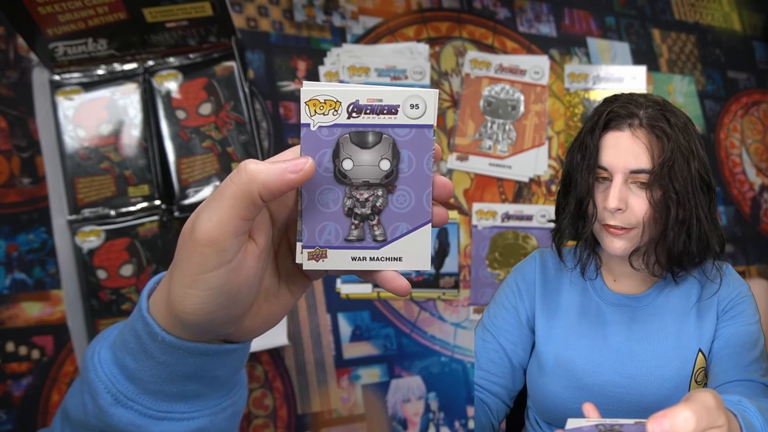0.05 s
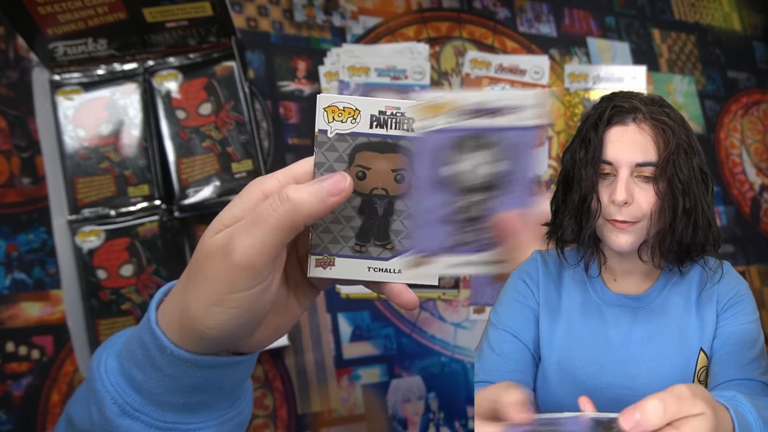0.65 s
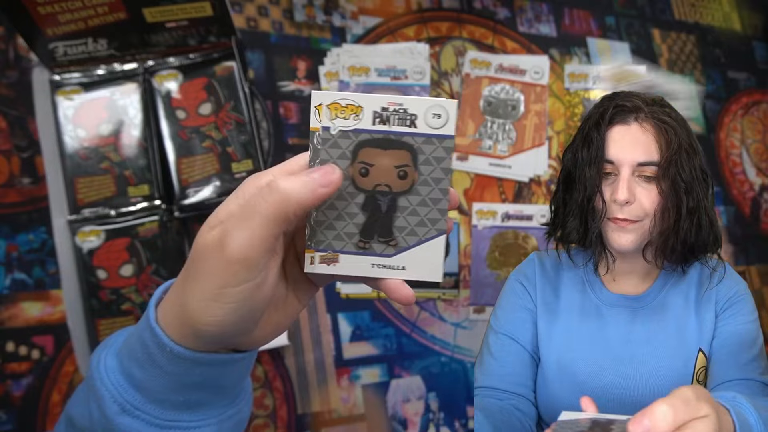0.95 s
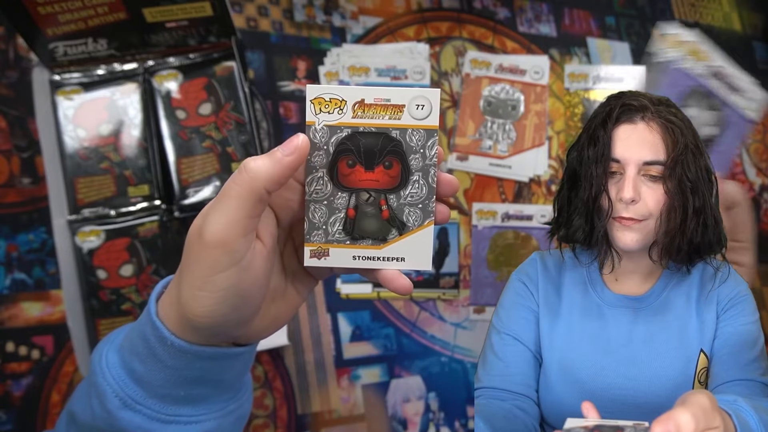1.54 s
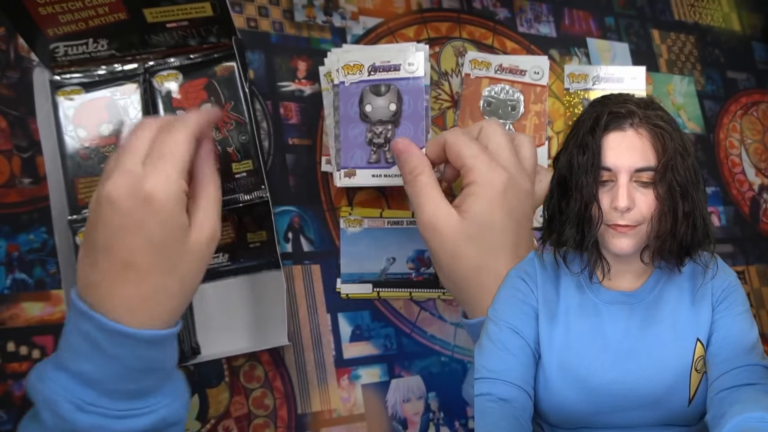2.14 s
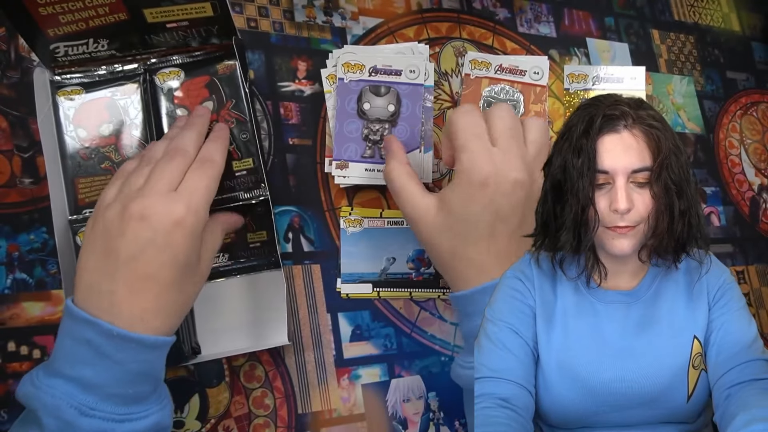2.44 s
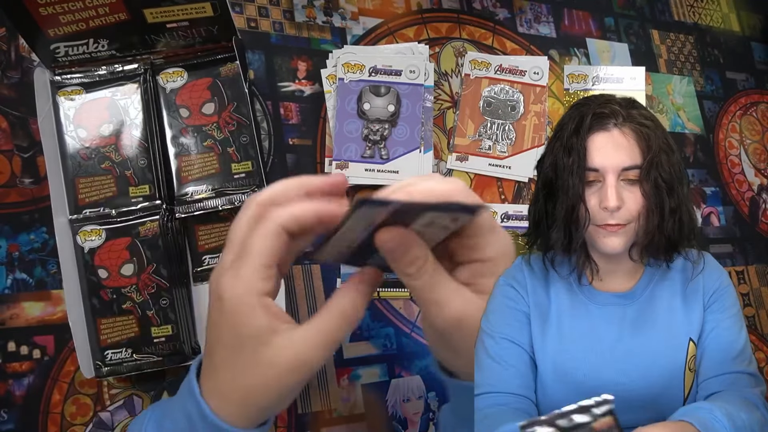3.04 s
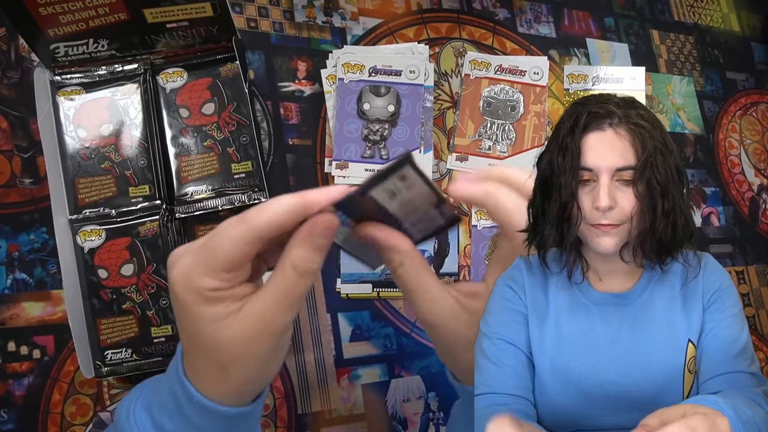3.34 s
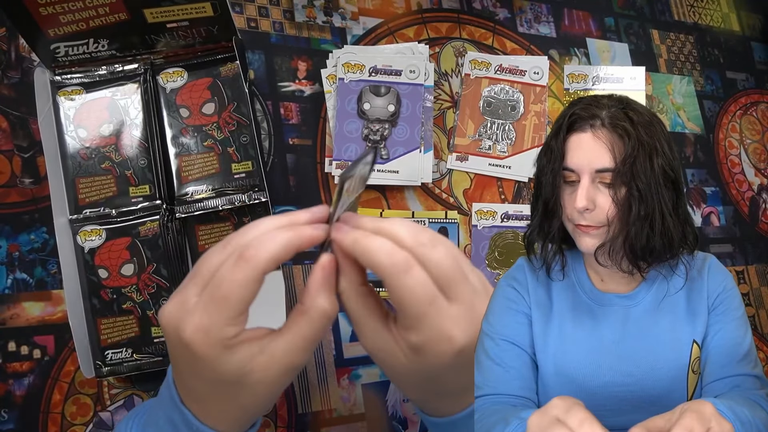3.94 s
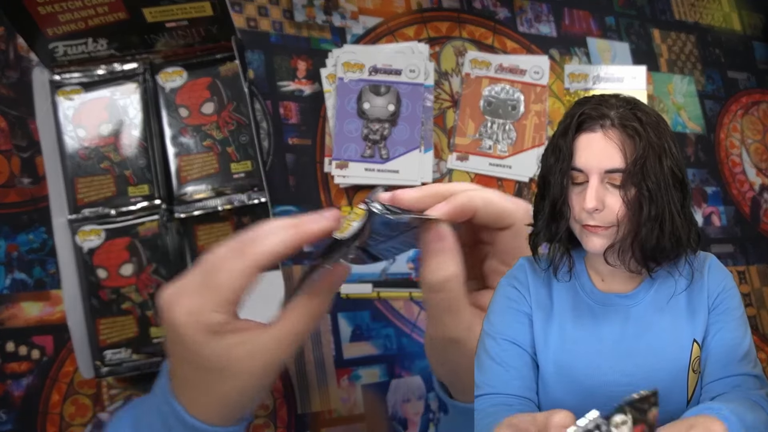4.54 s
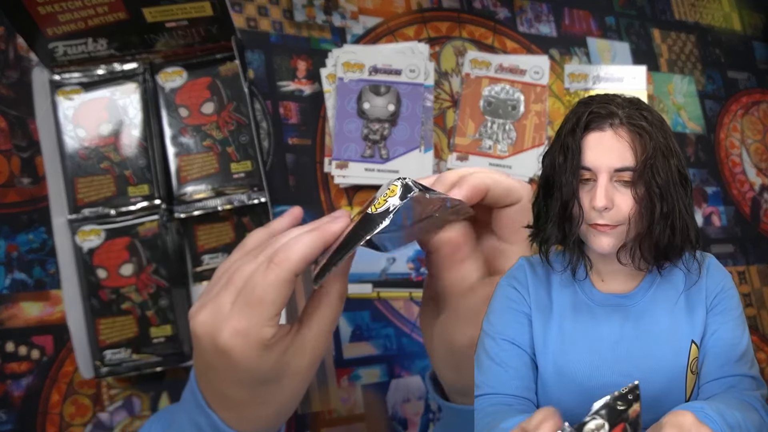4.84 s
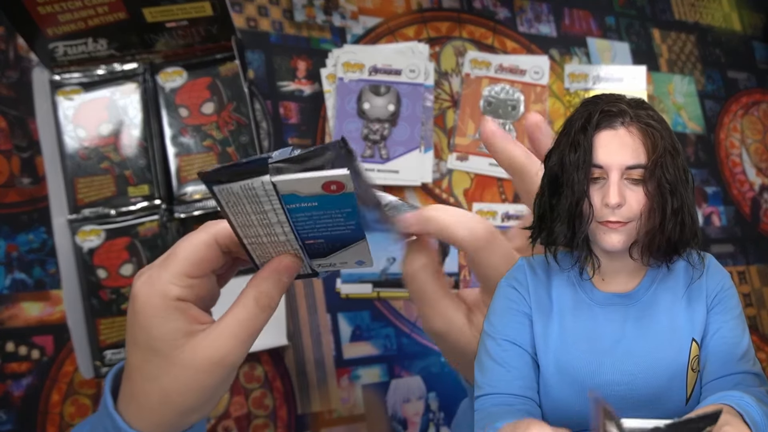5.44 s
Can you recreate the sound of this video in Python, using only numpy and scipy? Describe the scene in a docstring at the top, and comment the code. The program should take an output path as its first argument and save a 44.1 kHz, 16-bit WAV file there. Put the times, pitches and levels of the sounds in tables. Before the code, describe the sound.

Trading cards slide and land on a desk with a soft knock, then a foil pack is crinkled and torn open in two pulls.

```python
"""A foil pack is pinched and torn open in two pulls: creases snap one by one over a fine crackle,
and the pouch pops hollowly as its wall flips. Leading up to it, trading cards rasp off a stack
and land on a desk with a soft knock, and fingers skim the pack as they pick it up.
A small room answers, over a bed of low rumble, thin hiss and faint mains hum."""
import sys
import numpy as np
from scipy import signal
from scipy.io import wavfile

SR = 44100
rng = np.random.default_rng(int(sys.argv[2]) if len(sys.argv) > 2 else 0)


def pcm_store(signal):
    """Save signal as 16-bit PCM."""
    levels = np.round(np.clip(np.atleast_2d(signal), -1, 1) * 32767)
    wavfile.write(sys.argv[1], SR, levels.astype(np.int16).T)


N = 250598

# room tone: (frequency [Hz], relative level [dB])
AIR_EQ = [(20, 2), (70, -9.5), (170, -8.5), (260, -8.5), (360, -15), (700, -25), (1500, -30), (4000, -37.5),
          (15500, -39.5)]
# mains hum: (frequency [Hz], level [dB])
MAINS_HUM = [(60, -62.5), (120, -63), (241, -69.5)]
# room decay: (frequency [Hz], t60 [s])
ROOM_DECAY = [(150, 0.54), (500, 0.46), (1500, 0.28), (4000, 0.48), (8000, 0.3), (15000, 0.21)]
# tone of the reverb tail: (frequency [Hz], relative level [dB])
TAIL_EQ = [(100, 0.5), (450, 0.5), (1400, 3), (4000, -3.0), (8000, 2.0), (15000, 0.0)]
# hands jostling the desk: (start [s], hold [s], level [dB])
DESK_JOSTLES = [(2.4, 0.84, -58.5), (3.5, 0.99, -65), (5.05, 0.35, -58)]
# desk rumble: (frequency [Hz], relative level [dB])
RUMBLE_EQ = [(15, -3), (30, -3), (55, -3), (110, -17), (400, -61.5), (2000, -84)]
# hands and cards landing, and the jolt of the tear: (time [s], peak [dB], contact time [s])
DESK_KNOCKS = [(2.239, -43, 0.0047), (2.356, -28, 0.0024), (2.403, -35.5, 0.0062), (2.763, -38, 0.011),
               (5.16, -31.5, 0.0115)]
# body of the desk: (frequency [Hz], relative level [dB], t60 [s])
DESK_MODES = [(30.5, -13.5, 0.93), (67.5, -16.5, .2), (113.6, -1.5, 0.22), (125.5, 10, 0.15),
              (186.5, -0.5, 0.22), (231.5, 1.5, 0.16), (372, -4, 0.3), (485, -1.5, 0.18)]
# cards sliding off the stack: (start [s], hold [s], relative level [dB])
CARD_SLIDES = [(0, 0.037, -66.5), (0.514, 0.018, -67.5), (0.693, 0.0095, -55), (1.033, 0.016, -73.5),
               (1.121, .02, -63), (1.331, 0.0047, -53.5), (1.784, 0.12, -73), (1.929, 0.17, -69.5),
               (2.214, 0.078, -73), (2.42, 0.11, -68)]
# card on card: (frequency [Hz], relative level [dB])
RASP_EQ = [(100, -2), (500, -16), (900, -0.5), (1700, -0.5), (2300, 3.5), (3400, 2), (6500, 2.5),
           (10000, -2), (15500, -15)]
# fingers skimming smooth foil: (start [s], hold [s], relative level [dB])
FINGER_SKIMS = [(2.53, 0.21, -68.5), (2.73, 0.018, -55), (2.8, 0.097, -68), (2.945, 0.024, -61.5),
                (3.07, 0.057, -69), (3.355, 0.017, -62.5)]
# hiss of skin: (frequency [Hz], relative level [dB])
SKIN_EQ = [(300, -24), (1500, -2), (4000, -6.5), (7000, 0), (11000, -6.5), (15500, -13)]
# card edges, fingers and pack tapping: (time [s], level [dB], brightness [dB/octave], length [s])
LIGHT_TAPS = [(.703, -54.5, 5, .006), (1.0925, -39.5, 0, 0.0026), (1.337, -51.5, -3, 0.0029),
              (1.762, -54, -2, 0.003), (1.824, -57.5, 0, 0.0081), (2.294, -45, -2, 0.0081),
              (2.3562, -29, -2, 0.0034), (2.431, -48, 0, 0.011), (2.485, -51, 0, .0078),
              (2.5255, -54, 1, 0.006), (2.6075, -52.5, -1, 0.018), (2.7474, -32, 2, 0.015),
              (2.7614, -30, -1.8, 0.0023), (2.769, -37.5, -3.5, .0085), (2.996, -48.5, 6, 0.0009)]
# tone of a tap on card: (frequency [Hz], relative level [dB])
CARD_EQ = [(190, -34.5), (330, -0.5), (553, -3), (775, -12), (1280, -4), (2000, -8.5), (2860, -7),
           (4410, -12.5), (6930, -11.5), (8400, -18.5), (10200, -17.5), (15500, -27)]
# fingertips dragging on the pouch: (start [s], hold [s], level [dB])
POUCH_GRIPS = [(2.97, 0.75, -74), (4.45, 0.074, -53.5), (5.06, 0.12, -46), (5.25, 0.29, -57.5)]
# their dull rustle: (frequency [Hz], relative level [dB])
DRAG_EQ = [(50, -17.0), (420, 1.0), (700, -9), (1500, -14.5), (6000, -57)]
# the pouch flexing: (time [s], peak [dB], pitch [Hz])
POUCH_POPS = [(2.359, -33.5, 478), (2.7608, -35, 467), (3.618, -40.5, 485), (4.2, -36.5, 496),
              (4.353, -34, 395), (4.881, -30, 470), (4.892, -30, 442), (5.044, -26.5, 592),
              (5.073, -24.5, 455), (5.084, -29.5, 448), (5.134, -27, 460), (5.166, -18.5, 537),
              (5.279, -30, 436), (5.475, -34.5, 323), (5.61, -33, 443)]
# hollow body of the pouch: (pitch multiple, relative level [dB], t60 [s])
POUCH_MODES = [(.75, -7, .02), (1, 0, .035), (1.22, -4, .025), (1.65, -12, .02), (2.2, -11, .02),
               (2.6, -12, .025)]
# strain on the foil, from light pinches to ripping pulls: (start [s], hold [s], relative level [dB])
FOIL_PULLS = [(3.465, 0.043, -50), (3.59, 0.067, -45.5), (3.69, .06, -59), (3.765, .05, -50.5),
              (3.895, 0.071, -57), (3.99, 0.16, -61.5), (4.209, 0.067, -32.5), (4.29, 0.025, -41.5),
              (4.342, 0.021, -33.5), (4.44, 0.11, -55), (4.5, 0.018, -44.5), (4.742, 0.022, -55.5),
              (4.955, .04, -56), (5.005, 0.019, -44.5), (5.058, 0.031, -27.5), (5.113, 0.049, -28),
              (5.275, 0.033, -42), (5.35, 0.0084, -48.5), (5.465, 0.078, -54)]
# creases: (time [s], relative level [dB], brightness [dB/octave], length [s], facet pitch [Hz])
CREASE_SNAPS = [(3.2513, -47.0, 0.5, 0.0012, 5000), (3.2787, -49.0, -2.0, 0.0042, 3630),
                (3.46, -43, 6, 0.0025, 6470), (3.48, -36.5, 3.5, 0.003, 9200),
                (3.497, -34.0, 3.5, 0.0035, 10600), (3.5577, -33, 8, 0.0028, 8800),
                (3.569, -34.5, 3, 0.0026, 6140), (3.5851, -28, 4, 0.0024, 7850),
                (3.5937, -31.5, 4.5, 0.002, 6200), (3.6178, -24.0, 2.5, 0.0036, 5660),
                (3.641, -32, 3, 0.0036, 6000), (3.662, -37.5, -0.5, 0.0023, 7600),
                (3.6753, -34.5, -1, 0.0058, 2200), (3.763, -44, 0, 0.0044, 2100),
                (3.7794, -40, -2, 0.0072, 2200), (3.8079, -32, 2, 0.0018, 2200),
                (3.8114, -38, 2, 0.0024, 2340), (3.8173, -32.5, 3.5, 0.0033, 4300),
                (3.8867, -30, 3.5, 0.0012, 4400), (3.9021, -43, 7, 0.0025, 7200),
                (3.9305, -38.5, 0, 0.0095, 3900), (3.9933, -33.5, 0, 0.0018, 6900),
                (4.0556, -47.5, 18, 0.0021, 7300), (4.0836, -43.5, -0.5, 0.0022, 4470),
                (4.1284, -45, 14, 0.0024, 7900), (4.1726, -42.5, -1, 0.0042, 9200),
                (4.2, -19, 1, 0.0042, 2150), (4.2071, -18.5, 3, 0.0016, 2350),
                (4.227, -26, 1.0, 0.0045, 6100), (4.241, -22, 3.5, 0.003, 3670),
                (4.2648, -20.5, 4.5, 0.0013, 4740), (4.2841, -33.5, -8, 0.004, 1390),
                (4.2942, -21, 2.5, 0.0031, 8500), (4.3083, -35, -8, 0.0032, 1360),
                (4.333, -28.5, 4.5, 0.0012, 5770), (4.3374, -31.5, -0.5, 0.011, 1590),
                (4.3468, -27.5, 0.5, 0.0007, 3370), (4.3522, -20, 1.5, 0.0042, 6560),
                (4.4326, -42, 5, 0.0012, 7000), (4.465, -36.5, 1.5, 0.0034, 3450),
                (4.4803, -36, 5, 0.0022, 9800), (4.4935, -28.5, 6, 0.0016, 9600),
                (4.5084, -25.5, 0.5, 0.0026, 7500), (4.5229, -27.0, 0.5, 0.0013, 6860),
                (4.5767, -36.5, 0.5, 0.0025, 11100), (4.6192, -41.5, -1.5, 0.0018, 8850),
                (4.6902, -42, -1, 0.0064, 1300), (4.8297, -47.5, -4, 0.0018, 1490),
                (4.8795, -40.5, -5.5, 0.0035, 1200), (4.8885, -41, 0, 0.0024, 1160),
                (4.975, -35, 0, 0.0036, 4760), (4.9988, -38.5, 2.0, 0.0027, 7900),
                (5.0252, -34.5, 2.5, 0.0014, 8700), (5.032, -34, -3.5, 0.0038, 2300),
                (5.0448, -21.5, 1, 0.0026, 5100), (5.075, -18, 1, 0.0012, 9500),
                (5.084, -18.5, -3.5, 0.0016, 3060), (5.1213, -20.5, 1.5, 0.0043, 4600),
                (5.1578, -21.0, -4, 0.0042, 1190), (5.1631, -12, 2, 0.0022, 1430),
                (5.1675, -14, -2, 0.0022, 5400), (5.2256, -24, -1, 0.0038, 4500),
                (5.2764, -22.5, 0, 0.0066, 9200), (5.3524, -31.5, 2.5, 0.0024, 4100),
                (5.4092, -37.5, -2.5, 0.0031, 2580), (5.474, -30.5, -2.5, 0.0041, 2760),
                (5.5055, -38.5, -2.5, 0.0056, 3050), (5.5414, -37.5, -3, 0.003, 1700),
                (5.611, -40, -4, 0.0024, 2100)]
# tone of crinkling foil: (frequency [Hz], relative level [dB])
FOIL_EQ = [(100, -14), (300, -8.5), (500, -7), (780, -7), (1100, -3.5), (1450, 2), (2200, -2), (3300, 0),
           (5000, 1), (7000, -1.5), (9500, -3.5), (11500, -8.5), (15500, -14)]
# resonance of the flap, shifting as it comes loose: (time [s], frequency [Hz])
FLAP_SWEEP = [(3.6, 2200), (4.21, 2350), (4.26, 1970), (4.35, 1580), (4.55, 2420), (5.079, 3120),
              (5.16, 2850)]
# faint ring of stretched foil: (frequency [Hz], relative level [dB], t60 [s])
FOIL_MODES = [(1380, -82, 0.082), (1450, -64, 0.046), (2856, -55.5, 0.044), (8340, -53, 0.088)]


def amp(db):
    """Decibels to gain."""
    return 10 ** (np.asarray(db) / 20)


def unit_rms(x):
    """Scales to rms 1."""
    return x / np.sqrt(np.mean(x ** 2) + 1e-20)


def curve_at(points, hz):
    """Reads a curve on a log-frequency axis."""
    freqs, values = np.transpose(points)
    return np.interp(np.log(hz + 1), np.log(freqs + 1), values)


def add(mix, time, sound):
    """Lays a sound into the mix at a time in seconds."""
    part = mix[round(time * SR):][:len(sound)]
    part += sound[:len(part)]


def eq(x, spectrum, size=2048):
    """Causal EQ: attacks stay sharp and the ringing follows them."""
    log_gain = np.log(amp(curve_at(spectrum, abs(np.fft.fftfreq(size, 1 / SR)))))
    response = np.fft.ifft(np.exp(np.conj(signal.hilbert(log_gain)))).real
    return signal.oaconvolve(x, response[:size // 2])[:len(x)]


def ring(modes, scale=1):
    """Dying sines of a struck object."""
    t = np.arange(SR // 2) / SR
    return sum(amp(db - 60 * t / t60) * np.sin(2 * np.pi * hz * scale * t) for hz, db, t60 in modes)


def resonate(x, sweep, width_hz):
    """A unity-gain resonance riding a sweep of (time [s], frequency [Hz])."""
    hz = np.interp(np.arange(N) / SR, *np.transpose(sweep))
    carrier = np.exp(2j * np.pi * np.cumsum(hz) / SR)
    pole = np.exp(-np.pi * width_hz / SR)
    return 2 * (carrier * signal.lfilter([1 - pole], [1, -pole], x / carrier)).real


def strokes(moves, rise_s, fall_s):
    """Envelope of hand moves: each swells 20 dB per rise_s, holds, and fades 20 dB per fall_s."""
    t = np.arange(0, N, 16) / SR
    power = 0
    for start, hold, db in moves:
        before, after = np.maximum(start - t, 0), np.maximum(t - start - hold, 0)
        power += amp(db - 20 * before / rise_s - 20 * after / fall_s) ** 2
    return np.interp(np.arange(N) / SR, t, np.sqrt(power))


def crackle(spectrum, per_s, spread_db, patchy_db, families=12):
    """Countless tiny clicks, in families that each have a colour of their own."""
    out, hz = np.zeros(N), np.geomspace(500, 15000, 12)
    sizes = amp(spread_db * np.minimum(rng.exponential(1, N), 3.5)) * rng.choice([-1, 1], N)
    clicks = sizes * (rng.random(N) < per_s / SR)
    family = rng.integers(0, families, N)
    for k in range(families):
        out += eq(clicks * (family == k), np.c_[hz, patchy_db * rng.standard_normal(len(hz))])
    return unit_rms(eq(out, spectrum))


def burst(db, brightness, length, spectrum, grit, size=1024):
    """One snap or tap: tiny slips avalanche, then thin out within milliseconds."""
    sign, slip = rng.uniform(-1, 1, (2, size))
    age = np.arange(size) / SR / max(length, 8e-4)
    envelope = np.tanh(6 * age + .1) * np.exp(-age ** 1.25)
    snap = eq(np.sign(sign) * np.exp(grit * slip) * envelope, spectrum)
    tilt_hz, pivot_hz = np.array([1000, 11000]), 4000
    snap = eq(snap, np.c_[tilt_hz, brightness * np.log2(tilt_hz / pivot_hz)])
    return amp(db) * np.sqrt(.003 * SR) * snap / np.linalg.norm(snap)  # level: energy spread over 3 ms


def background():
    """The bed: low rumble, thin hiss and mains hum."""
    t = np.arange(N) / SR
    hum = sum(amp(db) * np.sqrt(2) * np.sin(2 * np.pi * (hz * t + rng.random())) for hz, db in MAINS_HUM)
    return hum + amp(-60) * unit_rms(eq(rng.standard_normal(N), AIR_EQ, size=8192))


def room(x, tail_db, build_s, tails=3):
    """The direct sound, plus diffuse tails that crossfade to suggest moving hands."""
    out = x.copy()
    for k in range(tails):
        hz, t, noise = signal.stft(rng.standard_normal(SR * 3 // 4), SR, nperseg=256)
        decay = amp(-60 * t / curve_at(ROOM_DECAY, hz)[:, None])
        tail = signal.istft(noise * decay, SR, nperseg=256)[1]
        tail *= 1 - np.exp(-np.arange(len(tail)) / SR / build_s)
        tail = eq(tail, TAIL_EQ)
        send = np.cos(np.pi * (2 * np.arange(N) / SR + k / tails)) * np.sqrt(2 / tails)
        out += amp(tail_db) * signal.fftconvolve(x * send, tail / np.linalg.norm(tail))[:N]
    return out


def desk():
    """A soft, long contact stirs only the desk's lowest modes; moving arms make it rumble."""
    rumble = unit_rms(eq(rng.standard_normal(N), RUMBLE_EQ, size=8192))
    out = rumble * strokes(DESK_JOSTLES, rise_s=.15, fall_s=.15)
    for time, db, contact in DESK_KNOCKS:
        knock = signal.fftconvolve(ring(DESK_MODES), np.hanning(round(contact * SR)))
        add(out, time, amp(db) * knock / abs(knock).max())
    return out


def cards():
    """Card stock rasps and sings a little as it slides, and taps as it lands; skin hisses on the pack."""
    rasp = crackle(RASP_EQ, per_s=4700, spread_db=5.0, patchy_db=0.5)
    rasp *= strokes(CARD_SLIDES, rise_s=0.061, fall_s=0.028)
    note_hz, sag_hz_per_s = 2070, 7500  # the edge's note sinks as the card comes free
    note = sorted((start + hold / 2 + dt, note_hz - sag_hz_per_s * dt)
                  for start, hold, _ in CARD_SLIDES for dt in (-0.049, 0.049))
    slide = rasp + amp(2) * resonate(rasp, note, width_hz=730)
    skim = unit_rms(eq(rng.standard_normal(N), SKIN_EQ))
    skim *= strokes(FINGER_SKIMS, rise_s=0.051, fall_s=0.093)
    out = amp(-2) * slide + amp(1) * skim
    for time, db, brightness, length in LIGHT_TAPS:
        add(out, time, burst(db, brightness, length, CARD_EQ, grit=.27))
    return out


def pouch(flip_s=0.0019):
    """The pack's wall flips through with hollow pops and rustles dully under the fingers."""
    rustle = crackle(DRAG_EQ, per_s=1000, spread_db=0.0, patchy_db=8.0)
    out = rustle * strokes(POUCH_GRIPS, rise_s=.11, fall_s=0.13)
    for time, db, hz in POUCH_POPS:
        pop = ring(POUCH_MODES, hz)
        pop *= np.tanh(np.arange(len(pop)) / SR / flip_s)  # the flip softens the attack
        add(out, time, amp(db) * pop / abs(pop).max())
    return out


def creases():
    """Each snapping crease flips a facet of foil, which gathers its energy round one pitch."""
    out = np.zeros(N)
    for time, db, brightness, length, hz in CREASE_SNAPS:
        snap = burst(db, brightness, length, FOIL_EQ, grit=0.62)
        facet = signal.lfilter(*signal.iirpeak(hz, Q=7, fs=SR), snap)
        pitched = snap + amp(2.5) * facet
        add(out, time, pitched * np.linalg.norm(snap) / np.linalg.norm(pitched))
    return out


def foil():
    """Snaps and ticks ride the tear's crackle; the loose flap colours them and the taut sheet rings."""
    strain = strokes(FOIL_PULLS, rise_s=0.013, fall_s=0.026)
    tear = crackle(FOIL_EQ, per_s=1200, spread_db=3.0, patchy_db=6.5) * strain
    ticks = crackle(FOIL_EQ, per_s=120, spread_db=-0.5, patchy_db=5.5)
    ticks *= strain ** 0.77  # they stand out most in a light pinch
    sheet = amp(-0.5) * creases() + amp(-3.5) * tear + amp(-17) * ticks
    sheet += amp(-0.5) * resonate(sheet, FLAP_SWEEP, width_hz=280)
    return sheet + signal.fftconvolve(sheet, ring(FOIL_MODES))[:N]


def scene():
    """All the handling at one microphone; the pouch's dull sounds carry less far into the room."""
    half_pouch = .5 * pouch()
    handling = foil() + cards() + desk() + half_pouch
    return (room(handling, tail_db=-10.0, build_s=0.00043) + half_pouch + background())[None]


def record(dry, ceiling=.9, cutoff_hz=16100):
    """The recorder rounds off the highest peaks, then trims the top end."""
    rounded = ceiling * np.tanh(dry / ceiling)
    lowpass = signal.firwin(401, cutoff_hz, window=("kaiser", 8), fs=SR)
    return signal.oaconvolve(rounded, lowpass[None], "same")


dry = scene()
out = record(dry)
pcm_store(out)
```